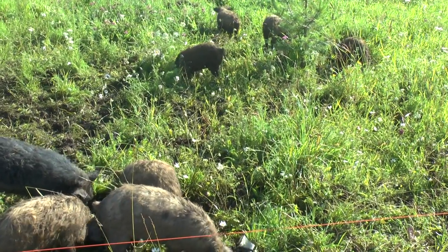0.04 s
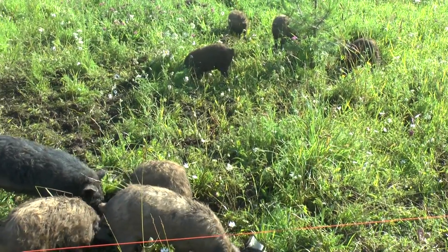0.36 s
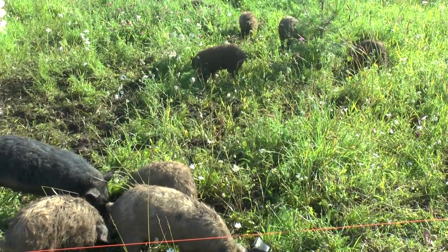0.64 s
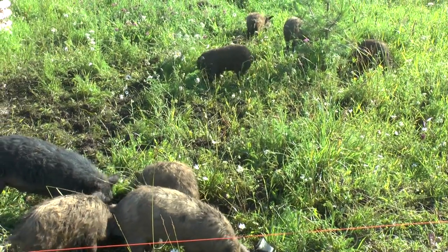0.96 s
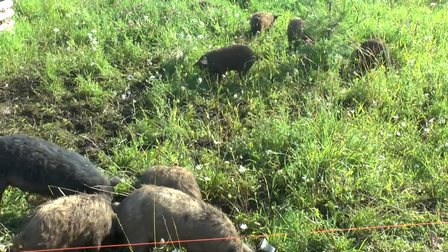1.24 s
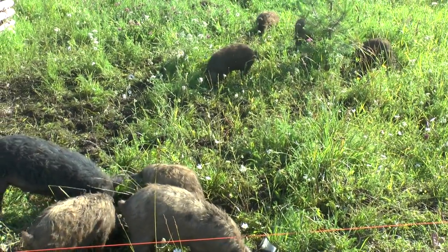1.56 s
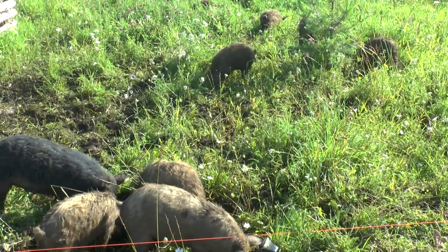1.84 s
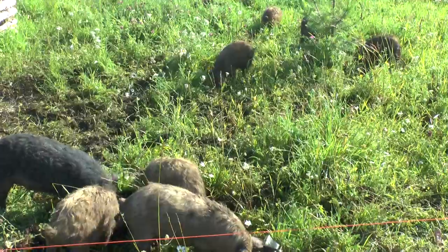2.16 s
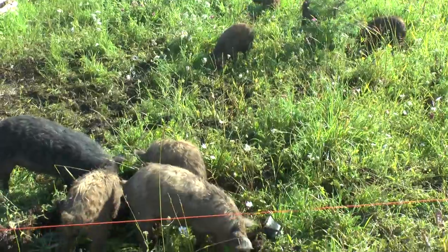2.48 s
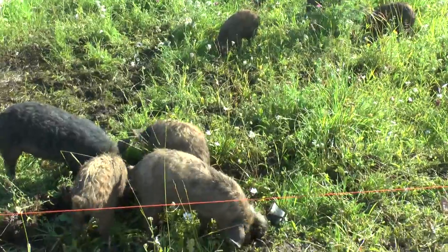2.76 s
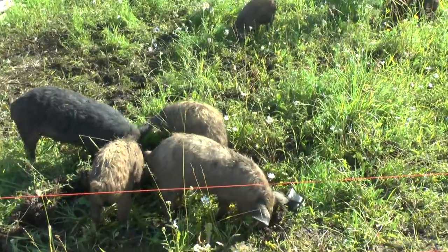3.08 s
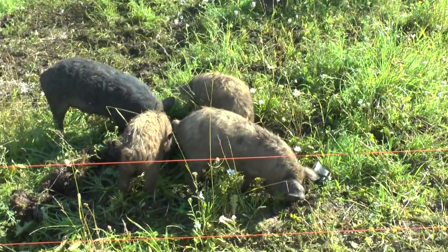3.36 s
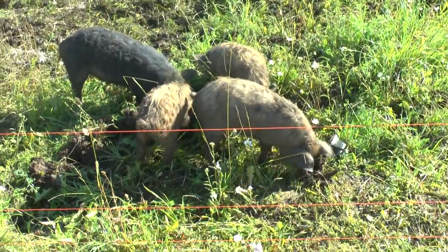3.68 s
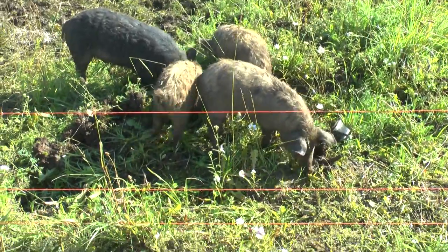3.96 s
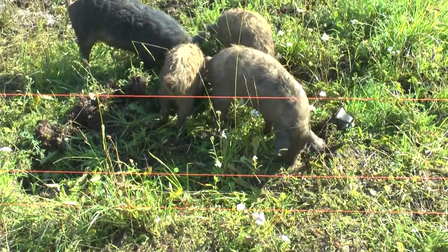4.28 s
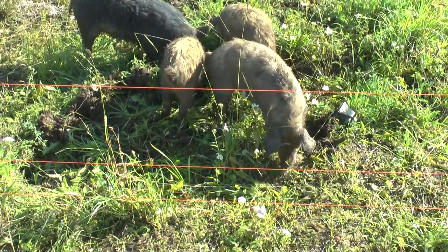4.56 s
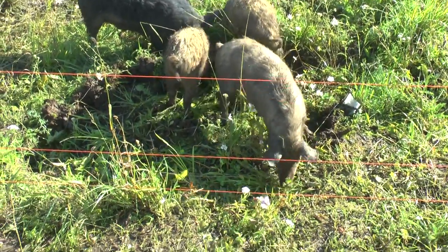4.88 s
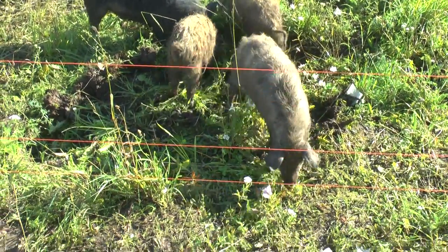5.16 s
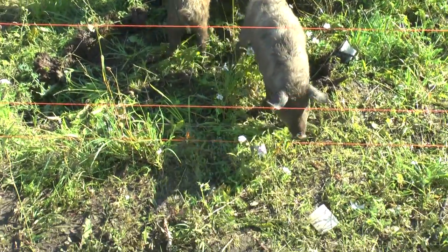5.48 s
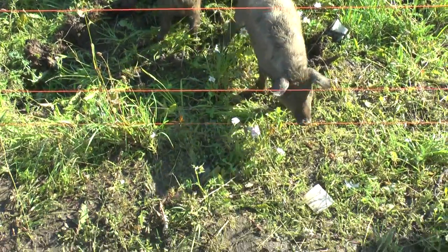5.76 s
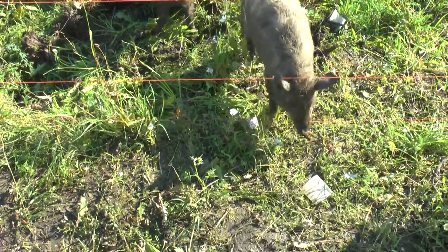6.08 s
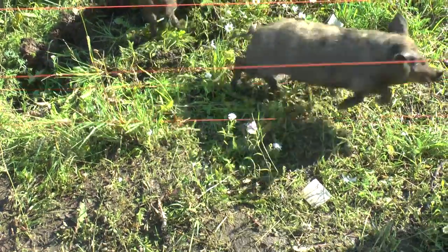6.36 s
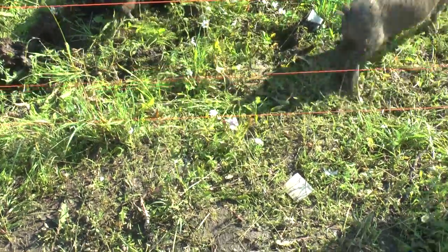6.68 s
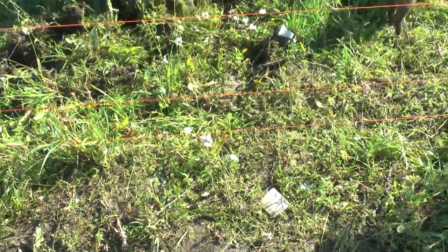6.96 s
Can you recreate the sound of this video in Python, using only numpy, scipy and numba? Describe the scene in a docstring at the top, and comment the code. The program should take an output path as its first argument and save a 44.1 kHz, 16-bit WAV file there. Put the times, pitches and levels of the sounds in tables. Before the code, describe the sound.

Outdoors in a field, a small dog gives a run of high, slightly hoarse yaps and then another pair over the constant chug and clatter of a small engine. Near the end, a sharp electric fence spark is followed at once by a brief, harsh pig squeal, the loudest sound, with a few quiet grunts around it and two weaker yaps afterwards. The engine briefly ducks in the microphone under each loud call.

```python
"""Engine, dog and pig at an electric fence

A single-cylinder engine runs steadily by a pasture: harmonic exhaust, knocks and ringing metal.
A small dog yaps, each yap an arch of pitch shaped by the throat's resonances. Pigs grunt softly.
The fence sparks faintly, then loudly, and a pig squeals: a whistle modulated by its vocal folds.
The recorder's gain control ducks the engine under every loud call and lets it swell back."""
import sys
import numpy as np
from scipy import signal
from scipy.fft import rfft, irfft, next_fast_len
from scipy.io import wavfile
from scipy.ndimage import uniform_filter1d
from numba import njit

SR = 44100
rng = np.random.default_rng(int(sys.argv[2]) if len(sys.argv) > 2 else 0)


def unload_audio(sound):
    """Save the sound as a 16-bit wav file, at the path given as the first command line argument."""
    columns = np.transpose(np.atleast_2d(sound))
    # keep every value between -1 and 1, then stretch to whole-number steps
    steps = np.round(np.clip(columns, -1, 1) * 32767)
    wavfile.write(sys.argv[1], SR, steps.astype(np.int16))


N = 314433
TIME = np.arange(N) / SR

# engine speed: time_s, firing_rate_hz
ENGINE_SPEED = [(0, 26.092), (.25, 25.951), (1.9, 25.913), (3.3, 26.192), (3.7, 26.126), (5.3, 26.021),
                (7.1, 26.109)]
# knocks of one engine cycle: place_cycles, decay_cycles, casing_db, valve_tap_db, valve_cover_db
KNOCKS = [(.19, 0.13, -9, -12.5, -18), (.34, 0.089, -9.5, -30, -32), (0.556, 0.17, -9, -6, -3.5),
          (.635, 0.11, -1, -6.5, -5.5), (.789, 0.14, -2, -8.5, -24), (0.851, 0.12, -4, -12, -11.5),
          (.945, 0.19, -2, -11, -30)]
# the engine's colour as the microphone turns: time_s, treble_db, casing_db, exhaust_db
MICROPHONE_AIM = [(0, -2.5, -0.5, -0.5), (3, -1, 1.5, 0), (4, 1.5, 1.5, 0), (5.5, 1, 1.5, 0.8),
                  (6.5, 1, -1, -1.5), (7.1, -4.5, -3, -3)]


def from_db(db):
    """Decibels to amplitude ratio."""
    return 10 ** (np.asarray(db) / 20)


def rms_one(x):
    """Normalise to unit power."""
    return x / np.sqrt(np.mean(x ** 2) + 1e-20)


def in_time(rows, t=TIME):
    """Interpolate each column of a table at the times t."""
    times, *columns = np.transpose(rows)
    return [np.interp(t, times, column) for column in columns]


def at_hz(points, hz):
    """Interpolate a spectrum on a log-frequency axis."""
    knots_hz, values = np.transpose(points)
    return np.interp(np.log(hz), np.log(knots_hz), values)


def filtered(x, gain_at):
    """Multiply the spectrum of x by a frequency response."""
    size = next_fast_len(x.shape[-1] + 2048, True)
    hz = np.maximum(np.arange(size // 2 + 1) * SR / size, 1)
    return irfft(rfft(x, size) * gain_at(hz), size)[..., :x.shape[-1]]


def coloured(x, spectrum):
    """Impose a spectral envelope, at unit power."""
    return rms_one(filtered(x, lambda hz: from_db(at_hz(spectrum, hz))))


def resonate(x, hz, width_hz):
    """A damped two-pole resonator with unit peak gain."""
    r = np.exp(-np.pi * width_hz / SR)
    feedback = [1, -2 * r * np.cos(2 * np.pi * hz / SR), r * r]
    return signal.lfilter((1 - r * r) / 2 * np.array([1, 0, -1]), feedback, x)


def drift(rate_hz, t=TIME):
    """Random fluctuation with a spread of about 1."""
    knots = np.arange(t[0], t[-1] + 2 / rate_hz, 1 / rate_hz)
    return np.interp(t, knots, rng.standard_normal(len(knots)))


def phase_of(hz):
    """Phase in radians is the integral of frequency."""
    return 2 * np.pi * np.cumsum(hz) / SR


def panned(x, lean_db):
    """A level difference at constant power places a sound left (+) or right (-)."""
    return rms_one(from_db([[lean_db / 2], [-lean_db / 2]])) * x


def ports(pair):
    """Phase difference: sound reaches the two microphone ports out of step."""
    # frequency_hz, left_lead_rad
    port_phase = [(100, 1), (450, 0.4), (860, 0.5), (1300, 0.97), (2200, 1.23), (2600, 1.4), (2950, 0.5),
                  (6300, 0.57), (7000, -2), (7800, 0.8), (9300, -1.9), (10400, -3), (15000, -4.5)]
    return filtered(pair, lambda hz: np.exp(1j * at_hz(port_phase, hz) * [[.5], [-.5]]))


def engine_direction(pair):
    """Level and phase differences in each band give the engine its direction."""
    # frequency_hz, left_minus_right_db
    leaning = [(60, -5), (110, 18), (200, -2.5), (380, 1), (700, 1), (1290, 3.5), (2380, 10.5), (4400, 5.5),
               (8120, 8), (15000, -2.5)]
    return filtered(ports(pair), lambda hz: from_db(at_hz(leaning, hz) * [[.5], [-.5]]))


def engine_image(pair):
    """Partial coherence: two independent signals, as mid and side, give the engine width."""
    # frequency_hz, left_right_coherence
    coherence = [(60, 0.43), (300, 1), (640, 0.61), (1400, 0.77), (3100, 0.96), (6800, 0.92), (10000, 0.6),
                 (15000, 1)]
    mid = filtered(pair[0], lambda hz: np.sqrt(1 + at_hz(coherence, hz)))
    side = filtered(pair[1], lambda hz: np.sqrt(1 - np.minimum(at_hz(coherence, hz), 1)))
    return rms_one(engine_direction(np.array([mid + side, mid - side])))


def exhaust(cycle, fires_at, intake_at, intake_share):
    """A harmonic series, phased by the exhaust and intake puffs and by dispersion in the silencer."""
    # harmonics of the firing rate: order, level_db
    harmonics = [(2, -54), (3, -61.5), (4, -39.5), (5, -42), (6, -38.5), (7, -48), (8, -41), (9, -55),
                 (10, -35.5), (11, -45.5), (12, -35.5), (13, -59), (14, -47.5), (15, -49), (16, -40.5),
                 (17, -38.5), (18, -30.5), (19, -41.5), (20, -29), (21, -39), (22, -35.5), (23, -47.5),
                 (24, -62), (25, -40), (26, -48.5), (27, -54), (28, -37.5), (29, -69), (30, -52)]
    note = np.zeros(N)
    for k, db in harmonics:
        puffs = np.exp(-2j * np.pi * k * fires_at) + intake_share * np.exp(-2j * np.pi * k * intake_at)
        smear = 0.011 * (k - 20) ** 2 + 0.19 * drift(7)   # the lows arrive latest
        note += from_db(db + 1.5 * drift(9)) * np.cos(2 * np.pi * k * cycle + np.angle(puffs) + smear)
    firing_db = np.interp(cycle, np.arange(256), 0.7 * rng.standard_normal(256))
    return np.sqrt(2) * note * from_db(firing_db)


def knocking(cycle, levels_db, between_db, repeat_share, uneven_db):
    """Impacts excite decaying vibration, partly the same in every cycle and partly random."""
    power = from_db(between_db) ** 2
    for (place, decay, *_), db in zip(KNOCKS, levels_db):
        turn, age = np.divmod(cycle - place + 1, 1)
        strength = from_db(db + uneven_db * rng.standard_normal(256))[turn.astype(int)]
        power = power + strength ** 2 * np.exp(-2 * age / decay)
    period = int(SR / np.mean(ENGINE_SPEED, axis=0)[1])
    new_turn = np.diff(np.floor(cycle - .5), prepend=0) != 0
    turn_starts = np.maximum.accumulate(np.arange(N) * new_turn)
    pattern = irfft(np.exp(2j * np.pi * rng.random((2, period // 2 + 1))), period)
    repeated = rms_one(pattern)[:, (np.arange(N) - turn_starts) % period]
    fresh = rng.standard_normal((2, N))
    return (np.sqrt(repeat_share) * repeated + np.sqrt(1 - repeat_share) * fresh) * np.sqrt(power)


def ringing_parts(cycle, play_s=0.00011):
    """Loose parts ring at their natural frequencies once a cycle; play makes each cycle differ."""
    # place_cycles, frequency_hz, swell_s, level_db
    parts = [(0.172, 7500, 0.0015, -35), (0.203, 953, 0.0032, -31), (.32, 592, 0.0022, -22.5),
             (0.53, 1198, 0.0012, -23), (.57, 970, 0.0028, -26.5), (0.599, 3940, 0.00066, -32),
             (.622, 6208, 0.0013, -24.5), (.665, 3163, 0.0017, -28.5), (.69, 3970, 0.0011, -30),
             (0.729, 699, 0.0021, -24.5), (0.78, 1042, 0.0021, -24.5), (0.846, 1269, 0.0053, -21.5)]
    firing_hz = np.mean(ENGINE_SPEED, axis=0)[1]
    out = np.zeros(N)
    for place, hz, swell_s, db in parts:
        turn, age = np.divmod(cycle - place + 1, 1)
        uneven_db, slip = rng.standard_normal((2, 256))[:, turn.astype(int)]
        swell = age / firing_hz / swell_s
        envelope = from_db(db + uneven_db) * (swell * np.exp(1 - swell)) ** 2
        out += envelope * np.sin(2 * np.pi * hz * (age / firing_hz + play_s * slip))
    return engine_direction(np.array([out, out]))


def valve_clatter(cycle):
    """Valve impacts radiate broadband ticks and excite the modes of their cover."""
    # frequency_hz, density_db
    tap_spectrum = [(1410, -60), (2400, -13.5), (2900, 0), (3350, -1.5), (3700, -9), (4050, -2.5),
                    (4400, -7), (5000, -7.5), (6130, -9.5), (6430, -9), (6690, -16.5), (7470, -11.5),
                    (8080, -12), (9770, -11.5), (10700, -16), (11600, -24.5), (14200, -27), (15800, -41)]
    # frequency_hz, width_hz, gain_db
    cover_modes = [(3200, 260, -2.5), (3950, 140, -7.5), (5280, 50, 3), (5864, 78, 4.5), (6160, 130, -4.5),
                   (6930, 170, -3.5), (7220, 67, -0.5), (7500, 47, -5), (8580, 60, -3), (9480, 220, -0.5),
                   (10020, 58, -5)]
    *_, tap_db, cover_db = np.transpose(KNOCKS)
    taps = knocking(cycle, tap_db, between_db=-12, repeat_share=0.13, uneven_db=0.6)
    on_cover = knocking(cycle, cover_db, between_db=-18.5, repeat_share=0.18, uneven_db=0.5)
    cover = rms_one(sum(from_db(db) * resonate(on_cover, hz, width) for hz, width, db in cover_modes))
    clatter = engine_image(coloured(taps, tap_spectrum) + from_db(-6) * cover)
    treble = filtered(clatter, lambda hz: 1 / (1 + (7500 / hz) ** 8))
    treble_db, _, _ = in_time(MICROPHONE_AIM)
    return clatter + (from_db(treble_db) - 1) * treble


def engine():
    """Exhaust note, turbulent rumble, casing knocks and valve clatter are phase-locked to one crank."""
    # exhaust turbulence: frequency_hz, density_db
    rumble_spectrum = [(20, -32), (70, -21), (110, -17), (250, -2.5), (380, -5.5), (460, 0.5), (660, 1),
                       (800, -9), (1100, -25), (3000, -80)]
    # frequency_hz, density_db
    casing_spectrum = [(440, -31), (720, -7), (800, -6), (1010, -0.5), (1160, -3), (1280, 2), (1400, -10),
                       (1520, -7), (1670, -4), (2060, -12.5), (2250, -9), (2540, -8), (3120, -28),
                       (5280, -120)]
    cycle = np.cumsum(in_time(ENGINE_SPEED)[0]) / SR
    note = panned(exhaust(cycle, fires_at=.935, intake_at=.385, intake_share=.45), lean_db=0.5)
    turbulence = rng.standard_normal((2, N)) * (1 + 0.092 * np.cos(2 * np.pi * cycle))
    rumble = from_db(-26.5) * engine_image(coloured(turbulence, rumble_spectrum))
    knocks = knocking(cycle, np.array(KNOCKS)[:, 2], between_db=0, repeat_share=0.29, uneven_db=-0.5)
    casing = from_db(-26.5) * engine_image(coloured(knocks, casing_spectrum)) + ringing_parts(cycle)
    valves = from_db(-26) * valve_clatter(cycle)
    _, casing_db, exhaust_db = in_time(MICROPHONE_AIM)
    return from_db(exhaust_db) * (note + rumble) + from_db(casing_db) * casing + valves


def yap(start, rise_s, release_s, top_hz, scoop, db, hoarse_db, fundamental_db, jaw_db_per_octave):
    """Source and filter: an arch of pitch, gruff at both ends, sweeps the dog's throat resonances."""
    # frequency_hz, gain_db
    throat = [(80, -58), (300, -1), (450, 3.5), (620, -4), (780, 7), (900, 3), (1030, 3.5), (1230, 4),
              (1400, 7.5), (1580, 4.5), (1750, -6.5), (2000, -3.5), (2300, -5), (2600, -6.5), (2900, -12),
              (3300, -26), (4500, -55), (9000, -64)]
    # the voice cracks into a rasp: time_s, half_length_s, added_gruffness
    cracks = [(2.91, .012, 0.4), (4.592, .012, .3), (4.908, 0.021, 0.5)]
    # brief loud accents near the end of some yaps: time_s, half_length_s, gain_db
    late_accents = [(1.85, .009, 2), (4.645, .009, 6), (4.935, .009, 1.5)]
    top = start + rise_s
    span = (TIME > start) & (TIME < top + release_s)
    t = TIME[span]

    def bumps(rows):
        return sum(height * np.exp(-((t - at_s) / half_s) ** 2) for at_s, half_s, height in rows)

    scooped = scoop * np.abs((t - top) / rise_s) ** 2.1
    dropped = .9 * np.abs((t - top) / release_s) ** 2.4
    arch = 1 - np.clip(np.where(t < top, scooped, dropped), 0, .7)
    octaves_down = -np.log2(arch)   # below the top the voice is hoarser and softer
    gruff = np.minimum(from_db(hoarse_db + 20 * octaves_down) + bumps(cracks), 1)
    jitter = (0.012 + .016 * gruff) * drift(503, t)
    phase = phase_of(top_hz * arch * (1 + jitter))
    tilt_db = jaw_db_per_octave - 47 * (t - t.mean())   # the closing jaw darkens the overtones
    voice = 0
    for k in range(1, 9):
        hz = k * top_hz * arch
        jaw_db = tilt_db * np.maximum(np.log2(hz / 1350), 0)
        colour_db = at_hz(throat, hz) + jaw_db + fundamental_db * (k == 1)
        shimmer_db = 21 * from_db(hoarse_db) * drift(89, t)
        voice = voice + from_db(colour_db + shimmer_db) * np.sin(k * phase + rng.uniform(0, 2 * np.pi))
    voice = voice * (1 + 0.51 * gruff * np.sin(phase / 2))   # strong and weak cycles alternate
    air = coloured(rng.standard_normal(len(t)) * (1 + np.cos(phase)), throat)
    voice = rms_one(voice) + from_db(-10) * gruff * air
    levelled = voice / np.sqrt(uniform_filter1d(voice ** 2, size=500))
    attack = np.clip((t - start) / 0.023, 0, 1)
    release = 1 - np.clip((t - top) / release_s, 0, 1) ** 1.76
    out = np.zeros(N)
    out[span] = levelled * from_db(db - 12.5 * octaves_down + bumps(late_accents)) * attack * release
    return out


def outdoors(pair, echo_db, scatter_db, t60_s=0.2, swell_s=0.026):
    """Reflection from the field's edge adds echoes; scattering by grass and trees adds a short wash."""
    # delay_s, level_db
    echoes = [(.028, -11), (.046, -14.5), (.068, -25)]
    mono = pair.mean(axis=0)
    age = TIME[:SR // 2]
    envelope = from_db(-60 * age / t60_s) * np.clip(age / swell_s, 0, 1) ** 2
    wash = rms_one(rng.standard_normal((2, len(age))) * envelope) / np.sqrt(len(age))
    out = pair + from_db(scatter_db) * signal.fftconvolve(mono[None], wash, axes=1)[:, :N]
    for delay, db in echoes:
        side_lags_s = rng.uniform(0, 0.0003, 2)
        echo = np.array([np.interp(TIME - delay - lag, TIME, mono) for lag in side_lags_s])
        out = out + from_db(db + echo_db) * echo
    return out


def dog():
    """Yaps cross the field by direct and reflected paths."""
    # start_s, rise_s, release_s, top_pitch_hz, scoop_share, level_db, hoarseness_db,
    # fundamental_db, jaw_db_per_octave
    yaps = [(1.508, 0.043, 0.075, 576, 0.19, -15, -16, -1, 0),
            (1.742, 0.078, .056, 678, 0.31, -8, -13, -3, 4),
            (2.03, 0.095, .05, 641, 0.41, -5.5, -17.5, 0.5, -0.5),
            (2.412, 0.093, 0.04, 635.4, .44, -4.5, -17, -.5, -1.5),
            (2.815, 0.077, 0.047, 590.5, 0.58, -3.5, -14, -1, -3),
            (4.53, 0.085, .07, 659, 0.47, -7.5, -17, 0.5, 0.5),
            (4.822, .088, .07, 621.4, .42, -5, -14.5, -0.5, 0.5),
            (6.73, 0.091, .04, 669, .13, -26, -22, 5, -4), (7.06, 0.073, .051, 612, .33, -16, -14, 1, 6)]
    direct = from_db(-3.5) * sum(yap(*row) for row in yaps)
    return ports(outdoors(panned(direct, lean_db=2.5), echo_db=0.5, scatter_db=-12.5))


def fence_sparks(snap_s, tail_s, tail_db, thump_db):
    """Each discharge is a transient: a snap, a wide tail and a dull thump, decaying exponentially."""
    # start_s, level_db
    discharges = [(5.424, -21), (6.0112, -4)]
    # frequency_hz, density_db
    spark_spectrum = [(500, -22), (3000, -19), (6000, 2), (8000, -9), (11500, -1.5), (15000, -20)]
    snap, tail, thump = np.zeros((3, N))
    for start, db in discharges:
        age = np.clip(TIME - start, 0, 1)
        snap += from_db(db) * (age > 0) * np.exp(-age / snap_s)
        tail += from_db(db + tail_db) * (age > 0) * np.exp(-age / tail_s)
        thump += from_db(db + thump_db) * np.sin(2 * np.pi * 60 * age) * np.exp(-age / 0.0076)
    crackle = coloured(rng.standard_normal((3, N)), spark_spectrum)
    return snap * crackle[0] + tail * crackle[1:] + thump


def grunts():
    """The herd's soft calls: five harmonics on a falling pitch, roughened by jitter."""
    # start_s, length_s, first_pitch_hz, last_pitch_hz, level_db, loss_db_per_harmonic
    calls = [(5.708, 0.087, 479, 368, -25.5, 9), (6.35, 0.054, 893, 400, -32, 8),
             (6.52, 0.121, 150, 118.6, -27.5, 4), (6.86, .07, 294, 275, -31, 12)]
    out = np.zeros(N)
    for start, length, first_hz, last_hz, db, loss_db in calls:
        span = (TIME > start) & (TIME < start + length)
        t = TIME[span]
        along = (t - start) / length
        pitch = first_hz + (last_hz - first_hz) * along
        phase = phase_of(pitch * (1 + 0.057 * drift(213, t)))
        voice = sum(from_db(-loss_db * k) * np.sin(k * phase) for k in range(1, 6))
        out[span] += from_db(db) * rms_one(voice) * np.sin(np.pi * along) * np.sqrt(2)
    return out


def formant(x, hz, width_hz):
    """A throat resonance: two resonators in cascade give steep sides."""
    return resonate(resonate(x, hz, width_hz), hz, width_hz)


def pig_throat(x):
    """The pig's vocal tract acts as a bank of parallel formants."""
    # frequency_hz, width_hz, gain_db
    formants = [(1136, 220, 3), (2330, 600, -8), (3130, 400, 3.5), (3650, 520, -1.5), (5150, 500, -5),
                (6200, 440, 3.5), (6600, 450, 3.5), (9800, 750, -4.5), (11400, 800, -8.5)]
    return rms_one(sum(from_db(db) * formant(x, hz, width) for hz, width, db in formants))


def squeal(start_s, attack_s, release_s):
    """A harsh burst breaks into a whistle, given sidebands by the vocal folds, and ends in a roar."""
    # time_s, pitch_hz, level_db, octave_db, rasp_db, roar_db, fold_pitch_hz, hum_db, then modulation
    # depth_1, depth_2, depth_3 of the folds' harmonics; octave, rasp, roar, hum relative to the whistle
    contour = [(6.104, 2690, -8, -4, -13, -4, 358, -22, 0.97, 0, 0),
               (6.117, 2555, -5, -12, -9, -4, 357, -25, .9, 0, .1),
               (6.129, 2866, 2, -9.5, -8, -4, 324.5, -29, .5, 0, .3),
               (6.149, 3016, 8.5, -4, -13, -14, 307, -32, 0, 0, .4),
               (6.159, 2910, 10, -11, -15, -17, 312, -32, 0.16, 0.09, .36),
               (6.177, 2960, 10, -5, -16, -19, 318.7, -28, 0.14, 0.14, 0.23),
               (6.197, 2985, 7, -6, -5, -20, 321.7, -21, 0, .3, 0),
               (6.229, 3015, 7.5, -2, -9, -18, 335, -19, 0, 0.26, .04),
               (6.247, 3070, 3, 4.5, -5, -22, 341.6, -11, 0, 0.38, .1),
               (6.263, 3110, 10, -5.5, -12, -28, 346.4, -17, 0.2, .06, 0.21),
               (6.277, 3170, 8.5, -9, -8, -21, 349, -21, 0.3, .08, 0.27),
               (6.291, 3050, 0, -2, 0, -11, 348, -18, 0.2, .1, .2),
               (6.304, 3155, 4.5, -2, -5, -9, 342, -20, .1, .1, 0.066),
               (6.319, 3060, 6, -13, -7, -9.5, 361, -16, 0.29, .1, 0)]
    # the half-open mouth at the onset: frequency_hz, density_db
    burst_spectrum = [(100, -60), (500, -35), (1200, -17), (1900, 7), (2700, -12), (3300, -16), (4400, 0),
                      (5400, -2), (6500, -11), (10500, -4), (15000, -36)]
    let_go = contour[-1][0]
    span = (TIME > start_s) & (TIME < let_go + release_s)
    t = TIME[span]
    pitch, level_db, octave_db, rasp_db, roar_db, fold_hz, hum_db, *depths = in_time(contour, t)
    fading_s = np.maximum(t - let_go, 0)
    pitch = pitch - 5740 * fading_s   # the whistle sags as the pig lets go
    jitter = (0.0045 + .04 * from_db(roar_db)) * drift(1500, t)
    phase = phase_of(pitch * (1 + jitter + .003 * drift(110, t)))
    folds = phase_of(fold_hz * (1 + .014 * drift(670, t)))
    sway = sum(depth * np.exp(1j * k * folds) for k, depth in enumerate(depths, 1))
    phase = phase + 0.35 * sway.imag   # pitch and strength swing together, favouring upper sidebands
    whistle = sum(from_db(db) * np.sin(k * phase) for k, db in enumerate((0, octave_db, -25, -33), 1))
    # the throat passes two of the folds' harmonics
    hum = from_db(hum_db) * (np.sin(3 * folds) + from_db(-13) * np.sin(2 * folds))
    tones = np.sqrt(2) * (whistle * (1 + 0.77 * sway.real) + hum) * from_db(-190 * fading_s)
    air = rng.standard_normal((3, len(t))) * (1 + 0.85 * np.cos(folds))
    rasp = from_db(rasp_db) * pig_throat(air[0] + 0.16 * air[1] * [[1], [-1]])
    roar = from_db(roar_db) * rms_one(formant(air[2], hz=2180, width_hz=970))   # throat wide open
    # the throat rattles until the whistle takes over
    burst_gate = np.clip(np.minimum(t - 6.105, 6.12 - t) / 0.0095 + 1, 0, 1)
    burst = from_db(-12) * coloured(air[0], burst_spectrum) * burst_gate
    envelope = np.clip((t - start_s) / attack_s, 0, 1) ** 2 * (1 - fading_s / release_s) ** 1.2
    voice = from_db(level_db) * envelope * (tones + rasp + roar) + burst
    out = np.zeros((2, N))
    out[:, span] = panned(voice, lean_db=-4)
    return outdoors(out, echo_db=-12, scatter_db=-24)


def scene():
    """Superposition of all the sources in the open field."""
    pig = squeal(start_s=6.093, attack_s=0.014, release_s=0.036)
    pasture = engine() + dog() + grunts() + pig
    return pasture + fence_sparks(snap_s=0.0014, tail_s=0.012, tail_db=-16, thump_db=-22)


@njit
def follow(excess, attack, release):
    """An envelope follower with separate rates of rise and fall."""
    out, held = np.zeros(len(excess)), 0.0
    for i in range(len(excess)):
        held += (excess[i] - held) * (attack if excess[i] > held else release)
        out[i] = held
    return out


def gain_control(x, threshold_db, attack_s, release_s):
    """Compression: power above the threshold turns the whole input down."""
    pole = np.exp(-1 / (0.002 * SR))
    power = signal.lfilter([1 - pole], [1, -pole], np.max(x ** 2, axis=0))
    excess_db = np.maximum(10 * np.log10(power + 1e-12) - threshold_db, 0)
    return x * from_db(-follow(excess_db, 1 / (attack_s * SR), 1 / (release_s * SR)))


def record(dry):
    """Gain control, faint electronic hiss, soft saturation and a steep low-pass filter."""
    held = gain_control(dry, threshold_db=-12.5, attack_s=0.0012, release_s=0.21)
    hiss = from_db(-66) * rng.standard_normal((2, N))
    rounded = .95 * np.tanh((held + hiss) / .95)
    return signal.sosfilt(signal.cheby2(16, 70, 16600, fs=SR, output="sos"), rounded)


dry = scene()
out = record(dry)
unload_audio(out)
```